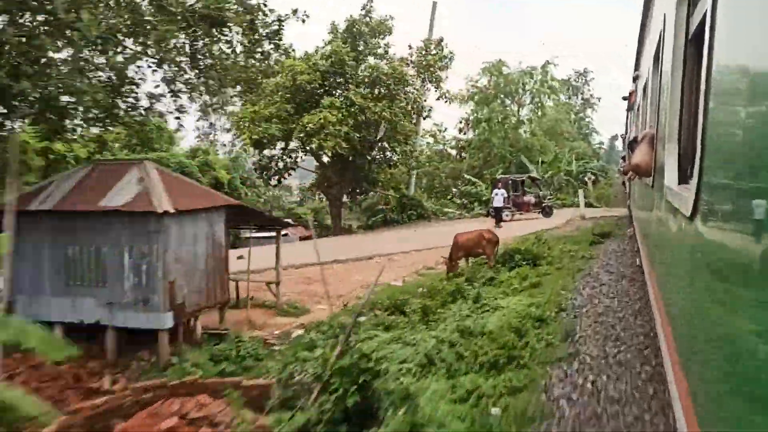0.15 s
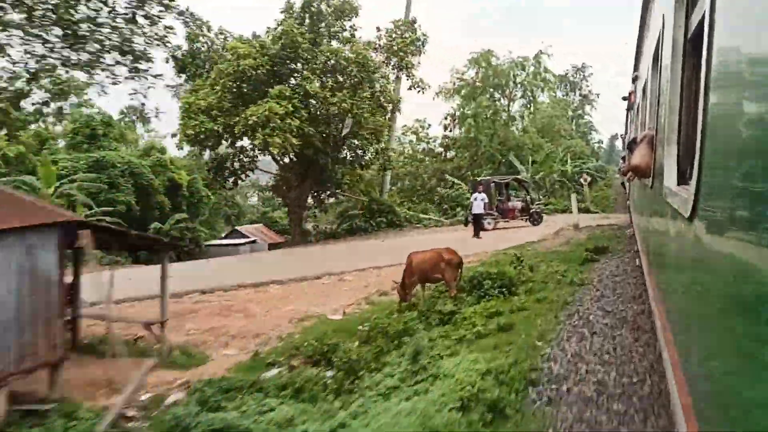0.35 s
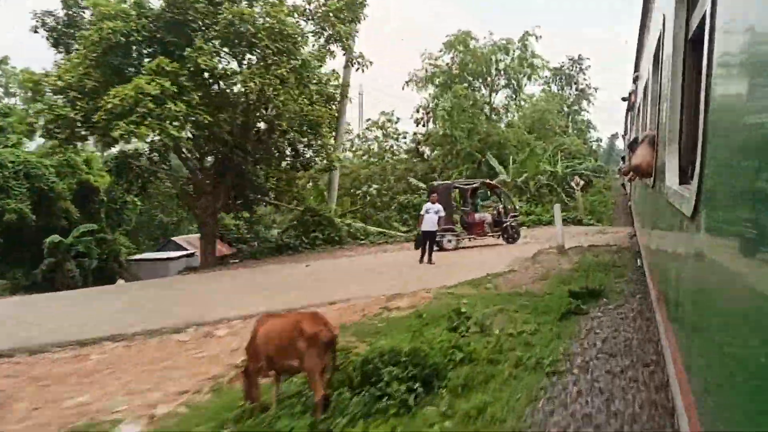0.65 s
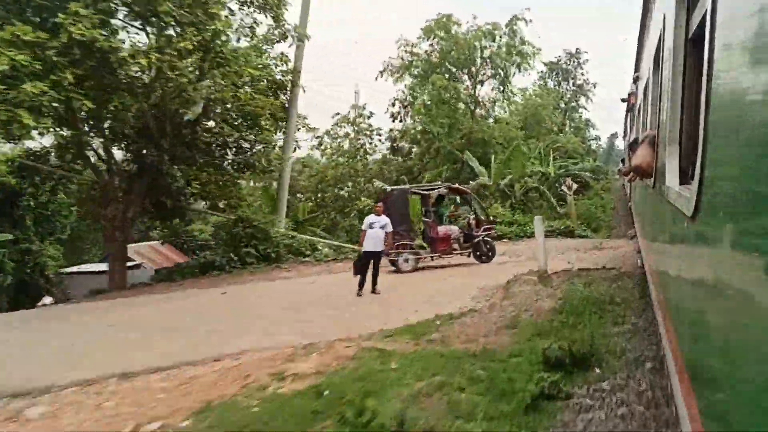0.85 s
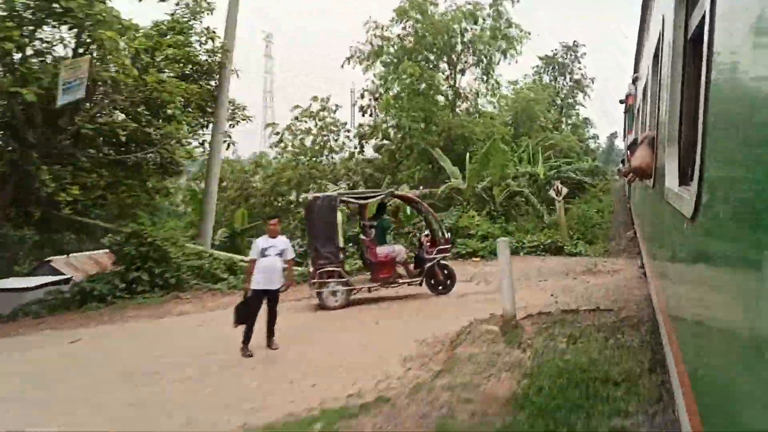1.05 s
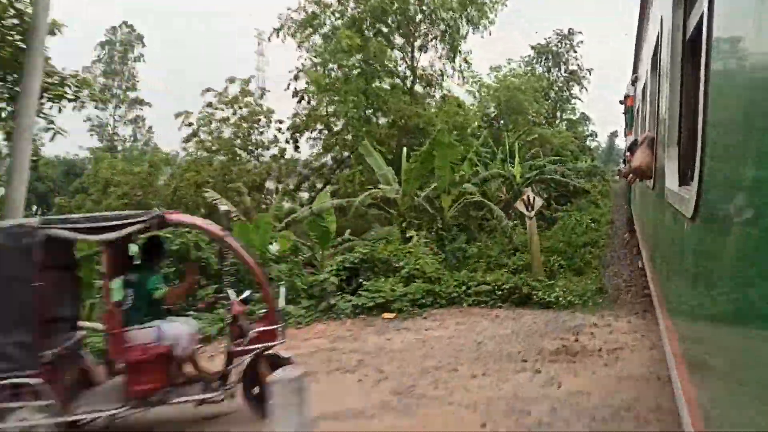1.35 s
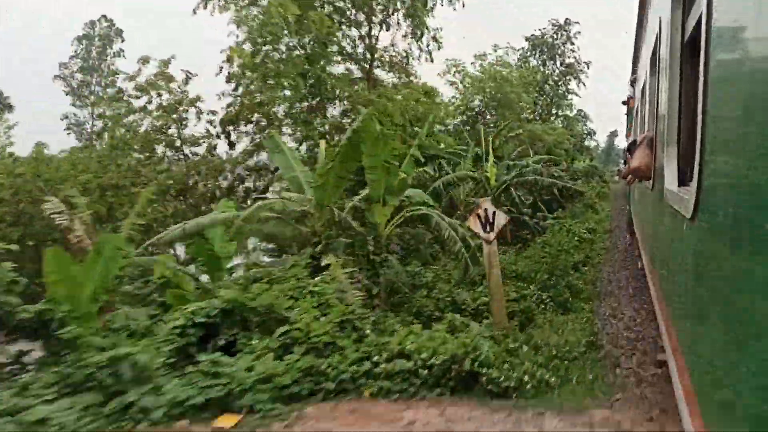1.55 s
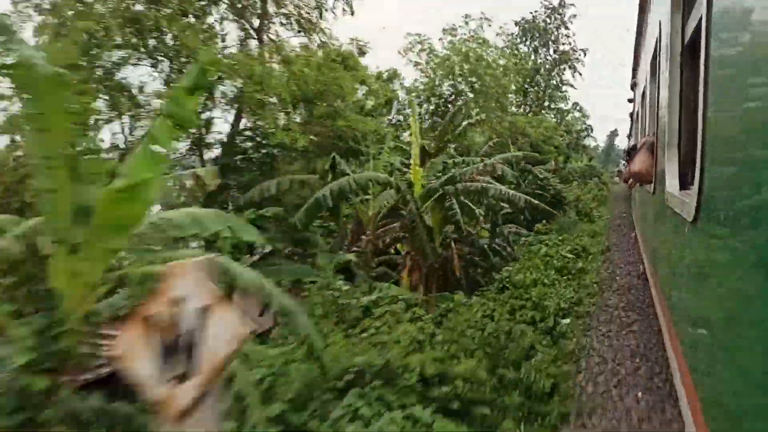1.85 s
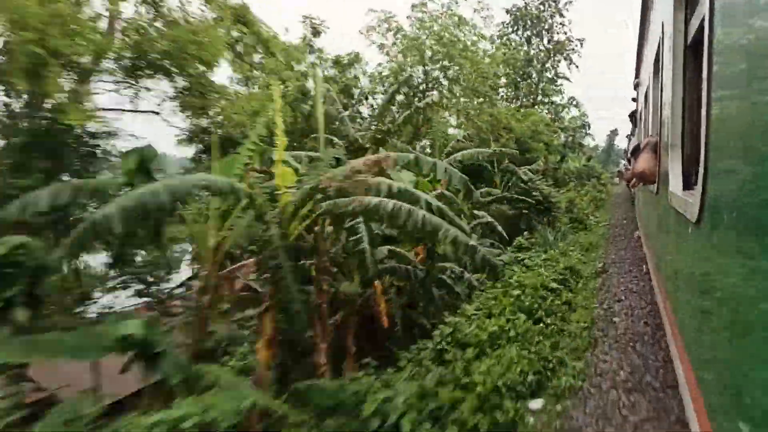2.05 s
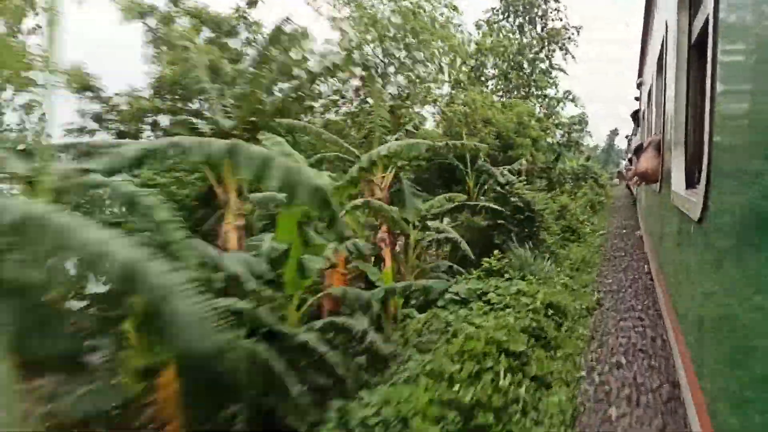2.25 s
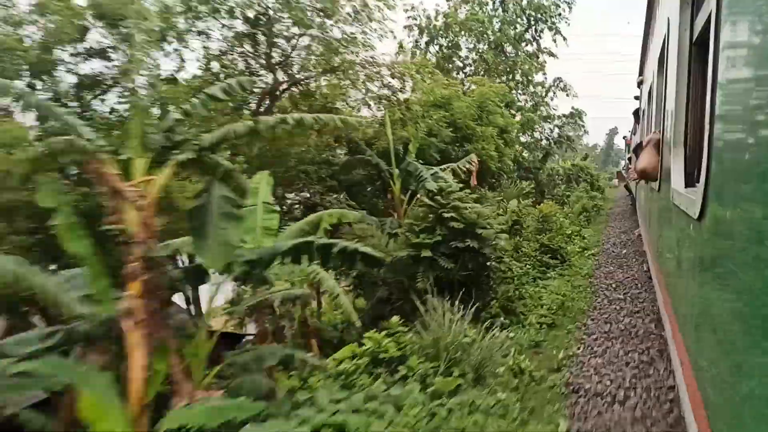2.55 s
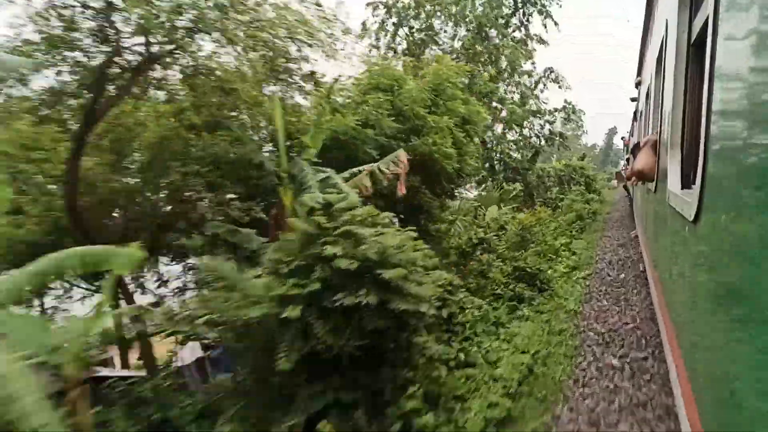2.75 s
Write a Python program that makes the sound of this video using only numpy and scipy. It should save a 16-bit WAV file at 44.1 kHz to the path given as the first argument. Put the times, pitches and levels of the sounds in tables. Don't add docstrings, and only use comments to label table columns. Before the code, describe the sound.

Wind thumps and flutters roughly on the microphone outside a speeding train, over low rail roar

```python
import sys
import numpy as np
from scipy import signal
from scipy.io import wavfile
from scipy.ndimage import uniform_filter1d

SR = 44100
rng = np.random.default_rng(int(sys.argv[2]) if len(sys.argv) > 2 else 0)


def ratio_of_db(decibels):
    return 10 ** (np.asarray(decibels, float) / 20)


def output_pcm(signal):
    pcm = np.clip(np.atleast_2d(signal).T, -1, 1) * 32767
    wavfile.write(sys.argv[1], SR, np.round(pcm).astype(np.int16))


N = 127890


def evened(x):
    return x / np.sqrt(np.mean(x ** 2) + 1e-20)


def band(x, lo_hz, hi_hz, order=1):
    return signal.sosfiltfilt(signal.butter(order, [lo_hz, hi_hz], "band", fs=SR, output="sos"), x)


def resonate(x, hz, width_hz):
    turn = np.exp(2j * np.pi * hz * np.arange(len(x)) / SR)
    r = np.exp(-np.pi * width_hz / SR)
    return 2 * (turn * signal.lfilter([1 - r], [1, -r], x / turn)).real


def drift(seconds):
    size = max(int(seconds * SR), 2)
    x = uniform_filter1d(rng.standard_normal(N), size, mode="wrap")
    return evened(uniform_filter1d(x, size, mode="wrap"))


def noise(colour, patch_db, size=1024):
    hz = np.fft.rfftfreq(size, 1 / SR)
    colour_hz, colour_db = np.transpose(colour)
    real, imag, patches = rng.standard_normal((N * 4 // size + 5, len(hz), 3)).T
    patches = uniform_filter1d(patches, size=6, axis=0)
    patches = evened(uniform_filter1d(patches, size=8, axis=1))
    shape_db = np.interp(np.log(hz + 1), np.log(colour_hz + 1), colour_db, -120, -120)
    z = (real + 1j * imag) * ratio_of_db(shape_db[:, None] + patch_db * patches)
    return evened(signal.istft(z, nperseg=size, noverlap=size * 3 // 4)[1][:N])


def bursts(times, db, width_s):
    t = np.arange(N) / SR
    return sum(gain * np.exp(-((t - s) / width_s) ** 2) for s, gain in zip(times, ratio_of_db(db)))


def wavelets(rows, cycles, db_gain):
    t, out = np.arange(N) / SR, np.zeros(N)
    for s, db, hz in rows:
        turns = (t - s) * hz
        out += ratio_of_db(db + db_gain) * np.cos(2 * np.pi * turns) * np.exp(-(turns / cycles) ** 2)
    return out


# time_s, level_db
GUST_STRENGTH = [(0.0, -31.5), (0.16, -37), (0.3, -30.5), (0.44, -34), (0.86, -33.5), (1.01, -37.5),
                 (1.28, -30), (1.39, -34), (1.86, -33.5), (2.02, -32.5), (2.21, -37.5), (2.35, -27),
                 (2.52, -33), (2.9, -29)]
# pitch_hz, density_db (per Hz)
WIND_COLOUR = [(20, -42), (40, -35), (65, 0.5), (100, -0.5), (200, -8.5), (400, -13), (900, -35.5),
               (2000, -59)]


def headwind():
    even_s, evening = 0.021, 0.45
    gust_db = np.interp(np.arange(N) / SR, *np.transpose(GUST_STRENGTH))
    level_db = gust_db + 0.5 + 1.8 * drift(0.039)
    air = noise(WIND_COLOUR, patch_db=2, size=2048)
    power = uniform_filter1d(air ** 2, int(even_s * SR))
    air = evened(air / (power + 0.11) ** (evening / 2))
    return ratio_of_db(level_db) * air


# centre_s, peak_db, pitch_hz
PRESSURE_LUMPS = [(0.12, -21, 96), (0.142, -21, 131), (0.174, -16, 101), (0.227, -27.5, 117),
                  (0.254, -25, 118), (0.293, -20, 104), (0.382, -18.5, 114), (0.432, -17.5, 104),
                  (0.464, -23, 88), (0.648, -26.5, 116), (0.706, -26.5, 101), (0.757, -24.5, 106),
                  (0.789, -26.5, 108), (0.99, -26.5, 115), (1.047, -28.5, 91), (1.196, -35, 104),
                  (1.227, -19, 106), (1.285, -20.5, 115), (1.338, -24.5, 118), (1.361, -31, 87),
                  (1.571, -35.5, 107), (1.595, -24, 116), (1.616, -23, 114), (1.65, -26, 124),
                  (1.715, -24.5, 126), (1.767, -21.5, 111), (1.803, -31, 116), (1.91, -23, 122),
                  (1.973, -25, 117), (2.089, -30, 117), (2.291, -21.5, 90.5), (2.322, -19.5, 98),
                  (2.353, -16, 110), (2.395, -30, 125), (2.45, -20, 102), (2.586, -21, 115),
                  (2.622, -11, 103), (2.66, -15.5, 115), (2.717, -24.5, 95), (2.754, -27, 99.5),
                  (2.798, -27, 100), (2.832, -10.5, 125)]


def lumps():
    return wavelets(PRESSURE_LUMPS, cycles=0.7, db_gain=2)


# centre_s, peak_db, pitch_hz
EDGE_FLUTTERS = [(0.099, -29, 294), (0.118, -22.5, 267), (0.137, -23, 214), (0.201, -22, 268),
                 (0.234, -21, 249), (0.269, -22.5, 223), (0.345, -29, 263), (0.372, -18, 277),
                 (0.382, -23, 208), (0.393, -18, 251), (0.413, -21, 230), (0.429, -23, 290),
                 (0.447, -21.5, 284), (0.709, -33, 246), (0.727, -18, 273), (0.755, -23.5, 231),
                 (0.832, -22.5, 236), (0.852, -28, 266), (1.232, -18.5, 257), (1.252, -26.5, 271),
                 (1.328, -21, 230), (1.359, -23.5, 292), (1.51, -24, 248), (1.584, -20, 236),
                 (1.62, -22, 270), (1.637, -26, 232), (1.716, -26, 260), (1.732, -21, 203),
                 (1.782, -27.5, 265), (1.795, -21, 272), (1.876, -23, 240), (1.959, -32, 237),
                 (1.986, -32, 250), (2.087, -29.5, 296), (2.305, -42, 240), (2.322, -21, 208),
                 (2.35, -13.5, 254), (2.369, -20, 268), (2.38, -20, 308), (2.405, -37, 250),
                 (2.451, -20.5, 213), (2.545, -21.5, 227), (2.581, -25, 230), (2.62, -16.5, 250),
                 (2.631, -19, 300), (2.65, -20, 218), (2.688, -27, 287), (2.737, -22.5, 300),
                 (2.796, -33, 253), (2.808, -16.5, 282), (2.827, -15.5, 260), (2.838, -38, 265)]


def flutters():
    return wavelets(EDGE_FLUTTERS, cycles=0.7, db_gain=-0.5)


# centre_s, peak_db, pitch_hz
HOUSING_KNOCKS = [(0.129, -29.5, 540), (0.144, -22, 590), (0.17, -45, 573), (0.263, -50, 527),
                  (0.372, -26.5, 668), (0.391, -23.5, 626), (0.41, -27.5, 524), (0.429, -24.5, 625),
                  (0.511, -29.5, 530), (0.749, -30, 527), (0.856, -33, 552), (1.223, -39, 520),
                  (1.233, -29, 500), (1.25, -24, 476), (1.293, -26, 537), (1.325, -30.5, 558),
                  (1.363, -25.5, 540), (1.586, -28, 529), (1.61, -26.5, 567), (1.621, -33, 590),
                  (1.719, -31, 513), (1.789, -28, 548), (1.797, -43, 516), (1.831, -30, 527),
                  (1.909, -31.5, 560), (1.992, -28, 510), (2.086, -29, 613), (2.349, -25, 546),
                  (2.369, -33, 633), (2.379, -16, 480), (2.402, -33, 595), (2.451, -23, 598),
                  (2.499, -27, 544), (2.58, -25, 715), (2.62, -28, 647), (2.633, -21, 660),
                  (2.651, -49, 567), (2.658, -28, 586), (2.739, -21.5, 521), (2.78, -43, 568),
                  (2.797, -22, 551), (2.812, -19, 606), (2.825, -26, 644), (2.838, -16.5, 520)]


def knocks():
    return wavelets(HOUSING_KNOCKS, cycles=0.61, db_gain=-1)


def rustle(air):
    spread_s = 0.013
    force = np.sqrt(abs(uniform_filter1d(air ** 2, int(spread_s * SR))))
    return ratio_of_db(-20.5) * force * evened(band(rng.standard_normal(N), 265, 1130))


# centre_s, peak_db, brightness_db
PORT_SNAPS = [(0.1262, -31, -2), (0.1431, -39, -20), (0.2634, -36.5, -10), (0.369, -29.5, 0),
              (0.3934, -33, -1), (0.3972, -31.5, -18), (0.4036, -40, -15), (0.4286, -30, -6),
              (0.478, -35, -20), (1.0466, -38, -19), (1.2427, -42, -11), (1.2934, -35, -6),
              (1.3277, -41, -14), (1.4386, -37, -18), (1.6168, -40, -8), (1.749, -38, -15),
              (1.7688, -55, -15), (1.7787, -33, -10), (1.7907, -40, -12), (2.065, -35.5, -4),
              (2.3142, -34, -14), (2.3348, -35, -17), (2.344, -48, -11), (2.358, -42, -14.5),
              (2.3647, -34, -16), (2.3723, -44, -18), (2.3786, -29, -16), (2.4502, -34, -4),
              (2.5793, -44, -5), (2.6189, -39, -12), (2.6238, -44, -18), (2.6345, -22, -20.5),
              (2.64, -52, 1), (2.7373, -25.5, -25), (2.751, -35, -12), (2.7962, -38, -2), (2.806, -32, -5),
              (2.8097, -32.5, -25), (2.8263, -31, 5), (2.8371, -26.5, -16)]


def snaps():
    width_s, lead_s = 0.0013, 0.0002
    low_hz, split_hz, high_hz = 740, 1500, 3360
    t, out = np.arange(800) / SR - 0.009, np.zeros(N + 800)
    shape = np.exp(-(t / width_s) ** 2)
    click = 11 * (np.arange(len(t)) == shape.argmax())
    for s, db, bright_db in PORT_SNAPS:
        puff = rng.standard_normal(len(t)) * shape + click
        body = band(puff, low_hz, split_hz, order=2)
        edge = band(puff, split_hz, high_hz)
        crack = body / abs(body).max() + ratio_of_db(bright_db - 2) * edge / abs(edge).max()
        out[round((s + t[0] - lead_s) * SR):][:len(t)] += ratio_of_db(db + 2.5) * crack
    return signal.sosfilt(signal.butter(6, 3700, fs=SR, output="sos"), out[:N])


# pitch_hz, density_db (per Hz)
ROLL_COLOUR = [(60, -20), (180, -4), (500, -16.5), (1200, -26), (1600, -26), (3000, -25.5), (3700, -27),
               (4770, -38.5)]


def rolling():
    flicker_db = 0
    return ratio_of_db(-46 + flicker_db * drift(0.013)) * noise(ROLL_COLOUR, patch_db=1)


# pitch_hz, width_hz, level_db
WHEEL_MODES = [
    (832.4, 33, -56),
    (1093, 85, -54),
    (1780, 45, -65),
    (2150, 210, -66),
    (3360, 68, -76.5),
    (3616, 130, -67.5),
]


def wheel_rings():
    out = np.zeros(N)
    for hz, width_hz, db in WHEEL_MODES:
        ring = resonate(resonate(rng.standard_normal(N), hz, width_hz), hz, 3 * width_hz)
        out += ratio_of_db(db + 2 * drift(0.063)) * evened(ring)
    return out


# centre_s, half_length_s, pitch_hz, peak_db
WHEEL_SQUEAL = (1.835, .04, 1880, -59)


def squeal():
    s, half_s, hz, db = WHEEL_SQUEAL
    return wavelets([(s, db, hz)], cycles=half_s * hz, db_gain=0)


# pitch_hz, density_db (per Hz)
HISS_COLOUR = [(4700, -13), (5900, -3), (6200, 19.5), (6800, 21.5), (7100, 3), (7650, 1.5), (7750, -32.5),
               (11500, -22.5)]


def rolling_hiss():
    return ratio_of_db(-81.5 + 0.4 * drift(0.0083)) * noise(HISS_COLOUR, patch_db=0.69)


# centre_s, top_band_db, ring_db
RAIL_JOINTS = [(0.034, -64, -75), (0.143, -53.5, -55), (0.164, -48.5, -46), (0.312, -52, -56),
               (0.383, -52.5, -62), (0.398, -65, -57), (0.427, -62, -61), (0.456, -57, -59),
               (0.496, -64, -59), (0.99, -60.5, -72), (1.295, -51, -53), (2.336, -53.5, -56),
               (2.371, -53, -72), (2.657, -47, -49), (2.678, -51, -57), (2.697, -65, -53),
               (2.826, -51, -75), (2.861, -53, -54)]


def joints():
    width_s = 0.0049
    s, top_db, ring_db = np.transpose(RAIL_JOINTS)
    air = noise([(11620, 0), (12500, -1), (12800, -4), (13000, 1), (15750, -2.5)], patch_db=1.9)
    ring = rng.standard_normal(N)
    for _ in range(3):
        ring = resonate(ring, 6700, width_hz=730)
    top = ratio_of_db(-79.5 + 1.2 * drift(0.008)) + bursts(s, top_db - 17, width_s)
    return air * top + evened(ring) * bursts(s, ring_db - 13, width_s)


# pitch_hz, level_db (rms)
WHINE_TONES = [(3659.3, -76), (4859.3, -84), (6059.1, -86), (7259., -91), (12058.2, -96), (12118.2, -85),
               (12178.2, -94), (13258.1, -92), (13318.1, -83), (13378.1, -85), (13438.1, -93),
               (14458., -94), (14518., -89), (14578., -84)]


def whine():
    t, out = np.arange(N) / SR, np.zeros(N)
    for hz, db in WHINE_TONES:
        phase = np.pi / 2 * (hz / 60) ** 2
        out += np.sqrt(2) * ratio_of_db(db) * np.sin(2 * np.pi * hz * t + phase)
    return out


def scene():
    air = headwind() + lumps() + flutters() + knocks()
    wheels = rolling() + wheel_rings() + squeal() + rolling_hiss()
    return (air + rustle(air) + snaps() + wheels + joints() + whine())[None]


def filter_ticks(dry):
    period_s, first_s, late_s = 0.01, 0.003, 0.0013
    starts = np.arange(first_s, N / SR - period_s, period_s)
    late = rng.random(len(starts)) < 0.5
    size = 1.7 * rng.uniform(-0.32, 1, len(starts))
    at = ((starts + late_s * late) * SR).astype(int)
    gust = np.sqrt(abs(uniform_filter1d(dry[0] ** 2, size=2200)))
    ticks = np.zeros(N)
    ticks[at] = ratio_of_db(-51) * size * (10 * gust[at]) ** 1.4
    return ticks


def band_limit(x):
    return signal.sosfilt(signal.butter(12, 15750, fs=SR, output="sos"), x)


def record(dry):
    cut = signal.sosfiltfilt(signal.butter(2, 50, "high", fs=SR, output="sos"), dry)
    i, fade_s = np.arange(N), 0.004
    fade = np.minimum(np.minimum(i, N + 30 - i) / (fade_s * SR), 1)
    top_cut = signal.firwin(401, 15760, fs=SR)[None]
    mix = signal.oaconvolve(fade * (cut + filter_ticks(dry)), top_cut, "same")
    return band_limit(mix)


dry = scene()
out = record(dry)
output_pcm(out)
```